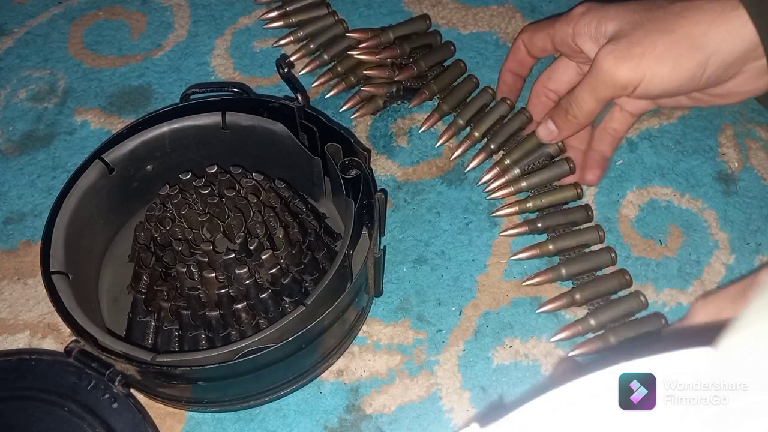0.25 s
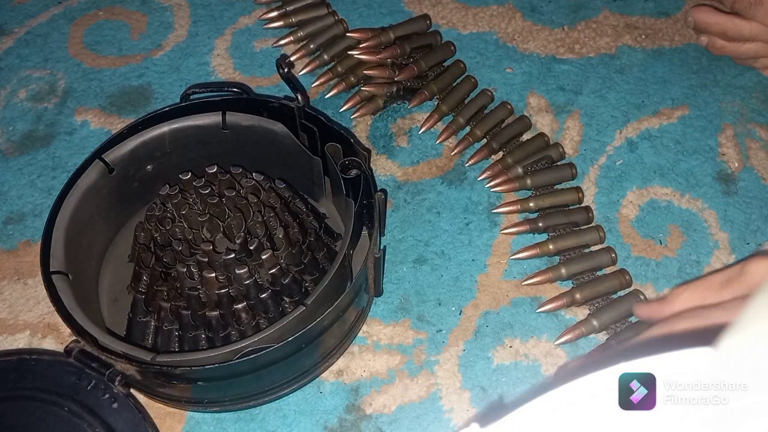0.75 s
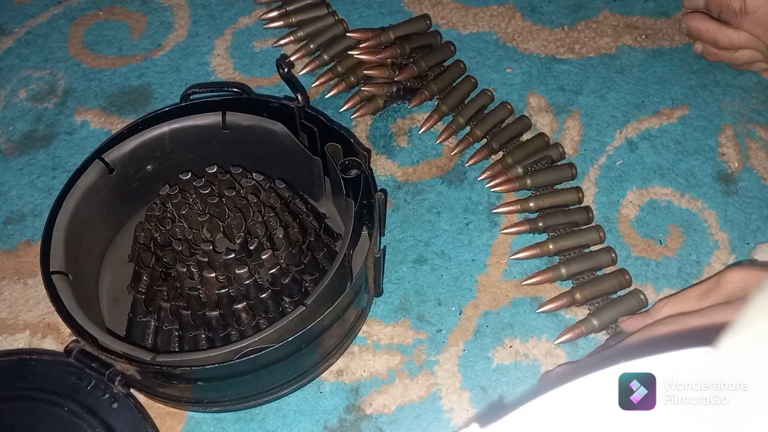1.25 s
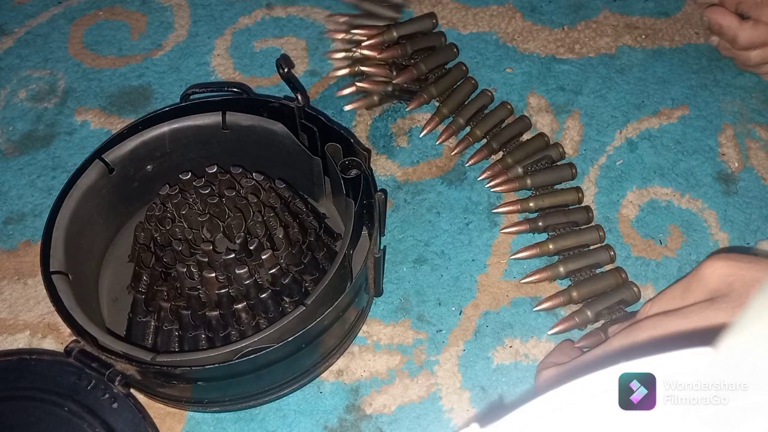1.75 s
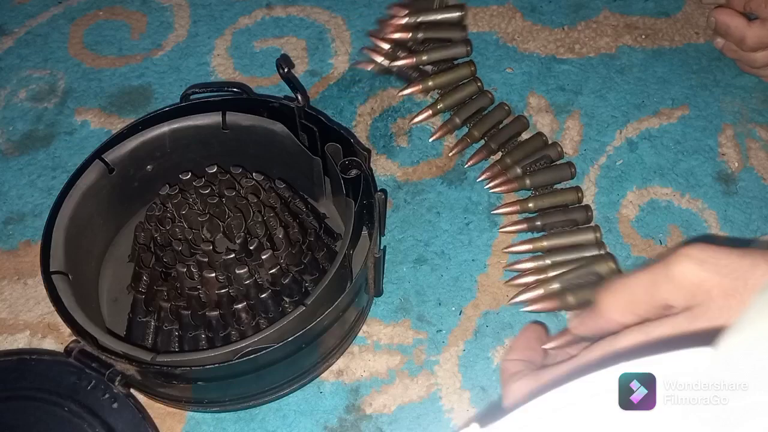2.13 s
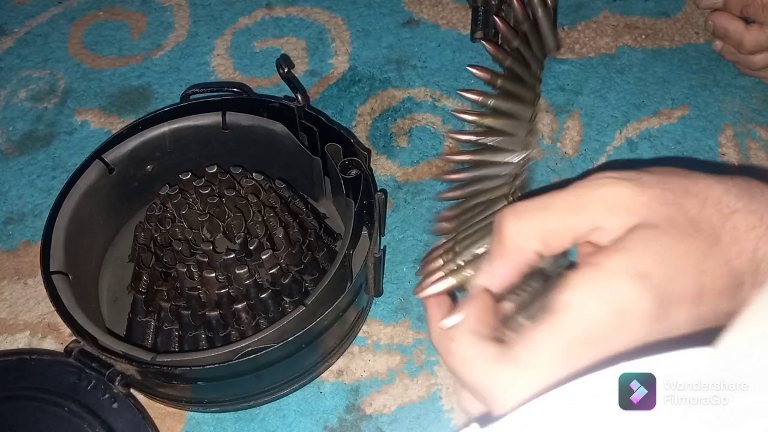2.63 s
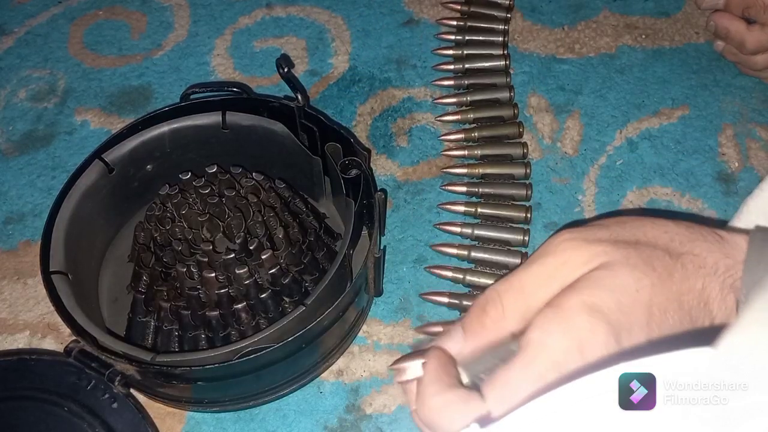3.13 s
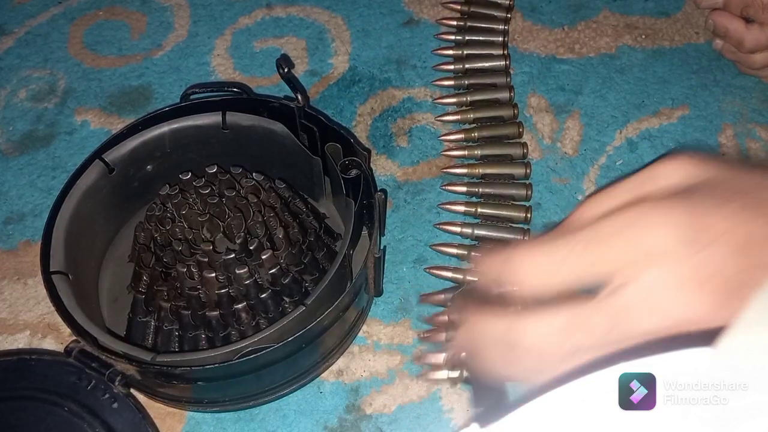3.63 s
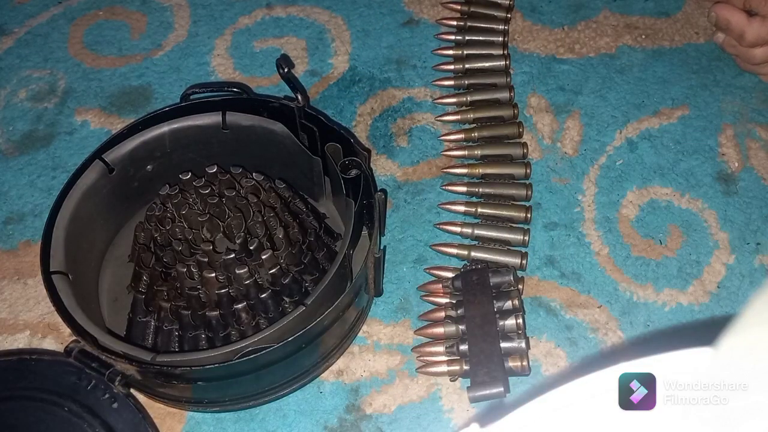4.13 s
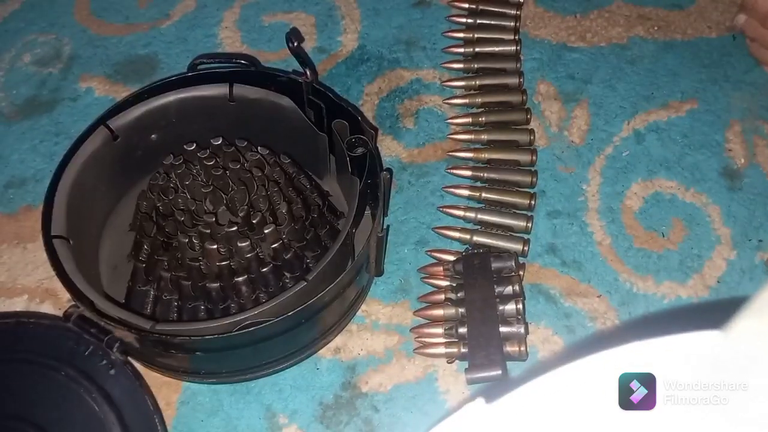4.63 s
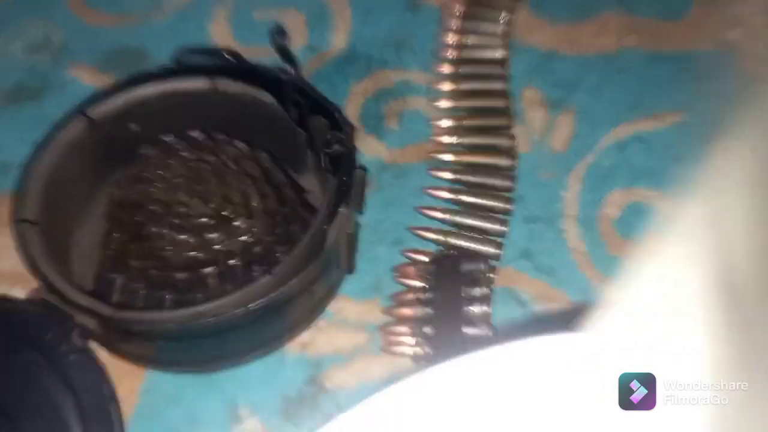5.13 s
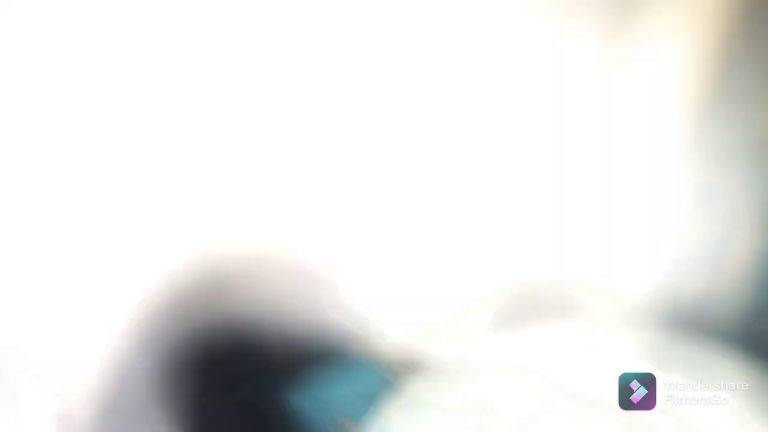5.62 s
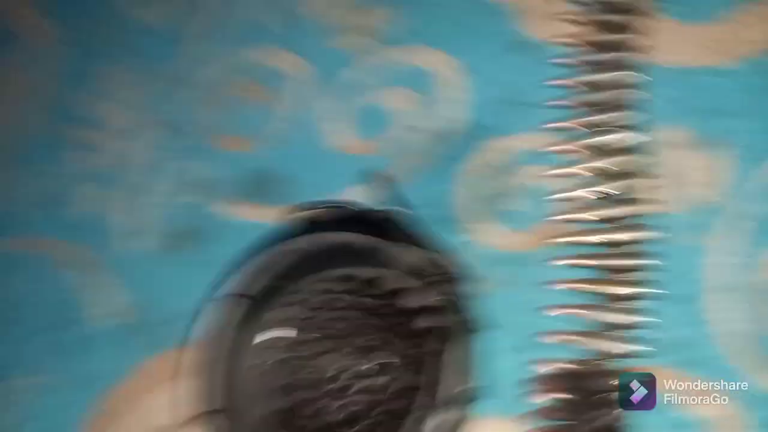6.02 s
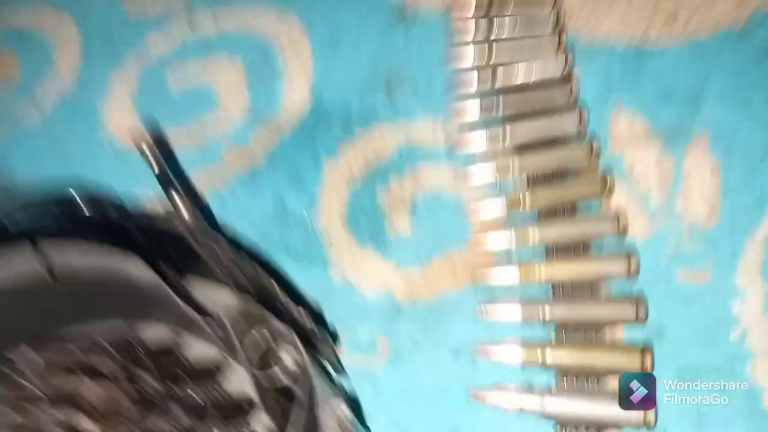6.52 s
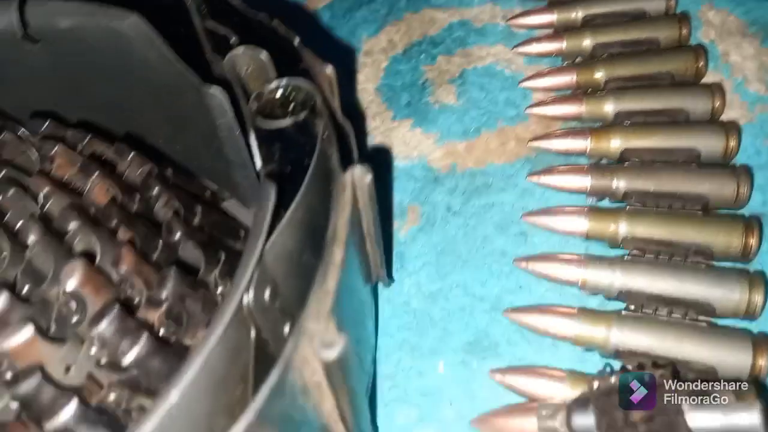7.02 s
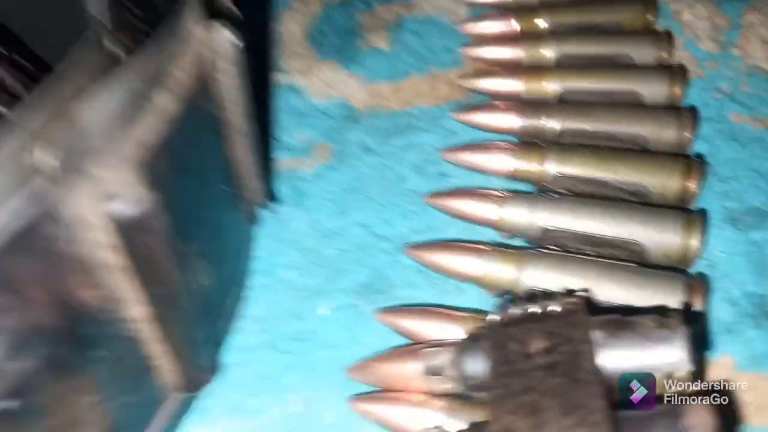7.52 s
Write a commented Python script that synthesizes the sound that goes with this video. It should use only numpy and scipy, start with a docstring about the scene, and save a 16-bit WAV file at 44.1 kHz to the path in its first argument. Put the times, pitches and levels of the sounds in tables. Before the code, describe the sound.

A small, quiet carpeted room with a low rumble. At 0.2-0.3 s a cartridge belt gives a few tiny bright clinks with a soft bump, then cloth brushes faintly around 0.5-0.8 s. Light ticks come at 1.5 s and faint link chatter from 1.7 to 2.5 s. From 2.9 to 3.5 s the folding belt clacks more sharply with a dull floor bump; at 3.6-3.8 s a dense run of bright clinks, a brief falling scrape and cloth hiss mark it being laid down. One small rattle follows at 4.2 s. At 4.45 s a hard finger tap strikes the phone, with rubbing and a faint squeak. Loud close knocks, gritty skin rubs and low thumps crowd 5.1-5.6 s and again 5.9-6.15 s, ending with a faint steel ring. Then soft brushing at 6.5-6.8 and 7.4-7.7 s over a swelling low hum.

```python
"""A linked cartridge belt is dragged and folded on a carpet beside its open steel drum: struck links
tick and ring as short modes, cartridge shells clink, and cloth brushes as a hiss of tiny contacts.
Then the phone lying next to it is picked up: fingers knock, rub and squeak on its resonant case, close
to the two microphone ports, and the case thumps as decaying low swings.
A small furnished room hums underneath as shaped noise with a few narrow resonances."""
import sys
import numpy as np
from scipy import signal
from scipy.fft import rfft, irfft
from scipy.io import wavfile
from scipy.ndimage import uniform_filter1d

SR = 44100
rng = np.random.default_rng(int(sys.argv[2]) if len(sys.argv) > 2 else 0)


def wav_out(sig):
    """Save sig, one row per channel (or a flat mono array), as 16-bit PCM at SR to the path in sys.argv[1]."""
    wavfile.write(sys.argv[1], SR, np.round(np.clip(np.atleast_2d(sig).T, -1, 1) * 32767).astype(np.int16))


N = 342331
TIME = np.arange(N) / SR

# bright tick of a steel link, also used for a fingernail: f/Hz, relative level/dB
TICK_SPECTRUM = [(5000, -26), (7600, -15), (9500, -2.5), (11300, -1), (13000, -4), (16000, -1.5)]
# duller clack of a steel link: f/Hz, relative level/dB
CLACK_SPECTRUM = [(300, -13.5), (900, -6.5), (2200, -10.5), (4100, -1), (5700, 9.5), (6600, 7), (7600, -33),
                  (10000, -18)]
# a movement builds up over a share of its length and dies away with a time constant in s
FLEX_ATTACK_SHARE, FLEX_RELEASE_S = 0.088, 0.0048
SLIDE_ATTACK_SHARE, SLIDE_RELEASE_S = 0.35, 0.0078


def undb(db):
    """Level in decibels to amplitude ratio."""
    return 10 ** (np.asarray(db) / 20)


def unit(x):
    """Normalise the signal power: scale to rms 1."""
    return x / np.sqrt(np.mean(x ** 2) + 1e-30)


def along(points, size):
    """Sample a (f/Hz, value) curve at the bins of a transform, interpolating on a log-frequency axis."""
    hz, value = np.transpose(points)
    return np.interp(np.log(np.fft.rfftfreq(size, 1 / SR) + 1), np.log(hz), value)


def curve(table):
    """Piecewise-linear function of time through (t/s, value) points."""
    return np.interp(TIME, *np.transpose(table))


def colour(x, points):
    """Minimum-phase filtering: the folded cepstrum of a (f/Hz, level/dB) curve gives a causal response."""
    size = 2048
    cepstrum = irfft(np.log(undb(along(points, size))))
    cepstrum[1:size // 2] *= 2
    cepstrum[size // 2 + 1:] = 0
    response = irfft(np.exp(rfft(cepstrum)))
    return signal.fftconvolve(x, response[None], axes=1)[:, :x.shape[1]]


def resonate(x, modes):
    """Linear resonance: a sum of single-pole peaks given as f/Hz, bandwidth/Hz, level/dB."""
    f = np.fft.rfftfreq(N, 1 / SR)
    response = sum(undb(db) / (1 + 2j * (f - hz) / wide) for hz, wide, db in modes)
    return irfft(rfft(x) * response, N)


def drone(hz, wide):
    """Narrow-band noise: white noise passed twice through one resonance, at rms 1."""
    mode = [(hz, wide, 0)]
    once = resonate(rng.standard_normal(N), mode)
    return unit(resonate(once, mode))


def ports(x, pan_db):
    """Level difference between two ports, left minus right in dB, at constant total power."""
    gains = undb(np.array([pan_db, -pan_db]) / 2).reshape(2, -1)
    return x * gains / np.sqrt(np.mean(gains ** 2, axis=0))


def add(out, s, x):
    """Superposition: mix x in at time s."""
    i = int(s * SR)
    out[:, i:i + x.shape[1]] += x[:, :N - i]


def walk(rate):
    """Slow random fluctuation: random steps at this rate in Hz, smoothed twice, with a spread near 1."""
    k = int(SR / rate)
    steps = np.repeat(rng.standard_normal(N // k + 1), k)
    return 1.4 * uniform_filter1d(uniform_filter1d(steps, k), k)[:N]


def stroke(s, length, attack_share, release_s):
    """Envelope of one movement: linear rise, steady hold, exponential decay after its length."""
    attack = np.clip((TIME - s) / (attack_share * length), 0, 1)
    return attack * np.exp(-np.clip((TIME - s - length) / release_s, 0, 20))


def grains(rate, spread_db, size=N):
    """Shot noise: random contacts per second of unequal size, each reaching the two ports differently."""
    sizes = undb(spread_db * np.minimum(rng.exponential(size=size), 4))
    struck = rng.random(size) < rate / SR
    return struck * sizes * rng.standard_normal((2, size))


def ring(modes, t, detune):
    """Modal decay: damped sines (f/Hz, level/dB, T60/s) with independent phases at the two ports."""
    total = 0
    for hz, db, t60 in modes:
        shifted_hz = hz * (1 + detune * rng.standard_normal())
        swing = np.sin(2 * np.pi * (shifted_hz * t + rng.random((2, 1))))
        total = total + undb(db) * np.exp(-np.log(1000) * t / t60) * swing
    return total


def contact(t, decay, grit):
    """Impact excitation: exponentially decaying noise, broken into unequal small contacts by grit."""
    flurry = rng.standard_normal((2, len(t))) * np.exp(grit * rng.standard_normal(len(t)))
    return flurry * np.exp(-t / decay)


def blow(x, db, decay, pan_db):
    """Energy scaling: give a hit the energy of a burst that starts at db and dies with this decay time."""
    x = x / np.sqrt(np.sum(x ** 2, axis=1, keepdims=True))
    return ports(x, pan_db) * undb(db) * np.sqrt(decay * SR / 2)


def link_ring(x, t60, count=14):
    """Modal response of a stamped steel link: short irregular modes, drawn anew for every call."""
    t = TIME[:SR // 12]
    modes = [(hz, 0, t60) for hz in rng.uniform(2500, 15500, count)]
    return unit(signal.fftconvolve(x, ring(modes, t, detune=0), axes=1)[:, :x.shape[1]])


def clinks(ring_db=-4, link_db=-5, bounce_db=-20, bounce_s=0.0037, snap_db=5, snap_s=0.0017, gain_db=1):
    """Impact and modal response: each strike snaps and bounces in a link and rings a detuned shell."""
    # strikes of cartridges and links: t/s, level before gain_db/dB, rattle decay/s,
    # clack relative to tick and shell/dB, left minus right/dB
    strikes = [(0.191, -39.5, 0.0015, -13, -16), (0.279, -52, 0.0074, 10, -25),
               (0.301, -44.5, 0.0018, -7, -13), (1.455, -51.5, 0.0015, -6, -5),
               (1.499, -47, 0.0024, -11, -6), (1.99, -53, 0.0048, 3.5, -18), (2.2386, -58, 0.011, 23, -15),
               (2.9707, -39, 0.0021, -3, -8), (2.996, -47.5, 0.0041, 19, -8),
               (3.2751, -41, 0.0014, -14, -13), (3.4987, -53, 0.015, 2.5, -10.5),
               (3.516, -49.5, 0.0032, -3.5, -5), (3.56, -51.5, 0.0043, -1, -14),
               (3.594, -50, 0.0051, 1.5, -5), (3.658, -42.5, 0.0033, 0, -6), (3.7046, -35, 0.0022, -12, -5),
               (3.7182, -31.5, 0.002, -10.5, -7), (3.7347, -47, 0.0053, -2, 4),
               (3.7891, -41, 0.0026, -7, -12), (5.031, -54, 0.012, 19, 1)]
    # modes of a cartridge shell: mean f/Hz, relative level/dB, T60/s
    shell_modes = [(4970, -1.5, 0.063), (11030, 18, 0.016), (11570, 16.5, 0.012)]
    out, t = np.zeros((2, N)), TIME[:SR // 6]
    for s, db, decay, clack_db, pan_db in strikes:
        snap = undb(snap_db) * contact(t, snap_s, grit=0)
        rattle = contact(t, decay, grit=0.96)
        bounce = undb(bounce_db) * contact(t, bounce_s, grit=0.38)
        push = snap + rattle + bounce
        link = unit(push) + undb(link_db) * link_ring(push, t60=0.0091)
        shell = signal.fftconvolve(push, ring(shell_modes, t, detune=0.0178), axes=1)[:, :len(t)]
        bright = unit(unit(colour(link, TICK_SPECTRUM)) + undb(ring_db) * unit(shell))
        clack = undb(clack_db) * unit(colour(link, CLACK_SPECTRUM))
        add(out, s, blow(bright + clack, db + gain_db, decay, pan_db))
    return out


def chatter(pan_db=-9, ring_db=0, cluster_db=0.5, count=4):
    """Shot excitation of modes: each pull shifts several links in clusters of tiny ringing ticks."""
    # pulls and folds of the belt: t/s, length/s, level/dB, clack relative to tick/dB
    flexes = [(1.658, 0.89, -80, 6), (1.729, 0.023, -69.5, 0.5), (1.775, 0.069, -67, -1.5),
              (1.866, 0.021, -66, 2.5), (2.909, 0.051, -69, 4), (2.976, 0.029, -58.5, 0.5),
              (3.198, 0.071, -67.5, 1), (3.286, 0.022, -58.5, 1), (3.621, 0.06, -62, -3),
              (4.172, 0.032, -61.5, 3)]
    out, clusters = np.zeros((2, N)), undb(cluster_db * walk(30.3))
    for s, length, db, clack_db in flexes:
        span = slice(int(s * SR), int((s + length + 10 * FLEX_RELEASE_S) * SR))
        effort = (clusters * stroke(s, length, FLEX_ATTACK_SHARE, FLEX_RELEASE_S))[span]
        links = 0
        for _ in range(count):
            ticks = grains(rate=220, spread_db=4, size=SR + SR // 2)[:, :len(effort)]
            links = links + unit(ticks) + undb(ring_db) * link_ring(ticks, t60=0.023)
        clack = undb(clack_db) * unit(colour(links, CLACK_SPECTRUM))
        sound = unit(colour(links, TICK_SPECTRUM)) + clack
        add(out, s, sound * effort * undb(db))
    return ports(out, pan_db)


def scrape(s=3.62, length=0.068, db=-62, start_hz=4500, fall_octaves_per_s=4.7, width_hz=1000, catch_db=2.0):
    """Stick-slip friction: a link slips along a cartridge as the folded end is laid down; its note falls."""
    glide = 2 ** (-fall_octaves_per_s * np.clip(TIME - s, 0, 2 * length))
    # reading the noise ever more slowly lowers its pitch
    note = np.interp(np.cumsum(glide) / SR, TIME, drone(start_hz, width_hz))
    caught = unit(note * undb(catch_db * walk(190)))
    return caught * undb(db) * stroke(s, length, FLEX_ATTACK_SHARE, FLEX_RELEASE_S)


def brush(flutter_db=1, body_hz=2200, body_width_hz=1400, attack_share=0.78, release_s=0.17):
    """Friction noise: cloth and carpet fibres hiss as dense shot noise over a broad resonance."""
    # sleeve and belt over the carpet: t/s, length/s, hiss level/dB, left minus right/dB, relative body/dB
    sweeps = [(0.42, 0.36, -71, -13.5, -22), (1.37, 1.49, -74, -9.5, -15.5), (3.43, 0.57, -65, -13, -12),
              (6.457, 0.38, -73.5, -8, -12), (7.384, 0.18, -66, -14.5, -8), (7.557, 0.2, -78.5, -44, 9)]
    # spectrum of the cloth: f/Hz, relative level/dB
    cloth = [(300, 1.5), (1200, -5.5), (2000, -12), (3800, -1.5), (5600, 2), (6600, -5), (7600, -29),
             (11000, -18), (16000, -13)]
    hiss = unit(colour(grains(rate=9800, spread_db=-1), cloth)) * undb(flutter_db * walk(23.0))
    body = drone(body_hz, body_width_hz)
    out = np.zeros((2, N))
    for s, length, db, pan_db, body_db in sweeps:
        fibres = ports(hiss + undb(body_db) * body, pan_db)
        out += fibres * undb(db) * stroke(s, length, attack_share, release_s)
    return out


def port_air(x):
    """Cavity resonance: the air in each microphone port colours whatever touches the case."""
    # left, then right port: f/Hz, bandwidth/Hz, level/dB
    port_modes = [(4360, 1100, 8), (5650, 190, 7)]
    return np.array([channel + resonate(channel, [mode]) for channel, mode in zip(x, port_modes)])


def knocks(gain_db=-3, tail_db=-30, tail_s=0.057, clean_s=0.00039):
    """Impact duration: the briefer the touch, the more one clean push joins its flurry; the case buzzes on."""
    # fingers on the case: t/s, level before gains/dB, decay/s, hardness at 3-7 kHz/dB,
    # nail tick above 8 kHz/dB, left minus right/dB, low edge f/Hz
    touches = [(4.4503, -11.5, 0.00051, -3.5, -15.5, 16, 1130),
               (4.474, -27, 0.0026, -17.5, -5.5, -0.5, 350), (4.526, -35.5, 0.0067, -1, -10.5, -3.5, 300),
               (4.6816, -37, 0.004, -4.5, -9.5, -9.5, 1280), (4.83, -56.5, 0.024, -6, -10, -1, 582),
               (5.0786, -39.5, 0.00088, 7.5, -4, 13.5, 306), (5.181, -28.5, 0.0082, -1.5, -16, 7.5, 820),
               (5.2121, -26, 0.0032, 9, -22, 25.5, 600), (5.2823, -18.5, 0.0018, -14, -42, -6.5, 150),
               (5.303, -27.5, 0.0036, 0.5, -27.5, 18, 700), (5.3898, -25, 0.0034, 5.5, 5.5, -15, 400),
               (5.4896, -26, 0.0061, -1.5, -19, 9, 453), (5.517, -35.5, 0.0038, -6, -22, 13, 300),
               (5.9202, -19, 0.0037, -10, -36, 22.5, 250), (5.924, -19.5, 0.0041, 2.5, -11.5, 0, 300),
               (6.0304, -27.5, 0.0013, 4.5, -27, 21, 300), (6.0552, -16, 0.0033, -17, -47, 4, 99.3),
               (6.069, -33, 0.014, -3, -26, -3, 200), (6.0996, -31.5, 0.0039, 2.5, -9, -8, 300),
               (6.126, -35, 0.0013, -22, -19, -13, 150), (6.1524, -41.5, 0.007, -9.5, -18, -8, 150)]
    # case under a soft, then under a hard touch: f/Hz, relative level/dB
    case_soft = [(100, 3.5), (400, 8), (850, -0.5), (1600, 2), (2500, -1.5), (3200, -20.5), (5000, -41.5)]
    case_hard = [(2000, -31), (3200, -0.5), (4200, -2), (5400, -5.5), (6500, -12.5), (7300, -31),
                 (10000, -48)]
    out, t = np.zeros((2, N)), TIME[:SR // 6]
    for s, db, decay, hard_db, nail_db, pan_db, low_hz in touches:
        flurry = contact(t, decay, grit=0.67) + undb(tail_db) * contact(t, tail_s, grit=0.18)
        push = unit(flurry) + clean_s / decay * unit(signal.unit_impulse(len(t)))
        push = signal.sosfilt(signal.butter(2, low_hz, "high", fs=SR, output="sos"), push)
        soft = unit(colour(push, case_soft))
        hard = undb(hard_db) * unit(colour(push, case_hard))
        nail = undb(nail_db) * unit(colour(push, TICK_SPECTRUM))
        add(out, s, blow(soft + hard + nail, db + gain_db, decay, pan_db))
    return port_air(out)


def rub(stick_db=0.7, shift_db=3.0, body_hz=1900, body_width_hz=1300):
    """Stick-slip friction: skin slips over the case, its shot noise coloured by the air in the ports."""
    # finger slides: t/s, length/s, level before the case gain/dB, left minus right/dB, finger pad body/dB
    slides = [(4.438, 0.07, -49.5, 5.5, -2.5), (4.541, 0.083, -47.5, 6.5, -15),
              (4.695, 0.076, -63, -8.5, 6), (4.967, 0.037, -54.5, 5.5, -2), (5.068, 0.037, -49, 20, 0),
              (5.088, 0.11, -34.5, 12.5, 4), (5.201, 0.067, -37, 13, -2), (5.272, 0.15, -37, 17.5, 5),
              (5.368, 0.2, -45.5, 13, -3), (5.752, 0.16, -57.5, 15, -14.5), (5.842, 0.026, -53.5, 14, 1.5),
              (5.921, 0.053, -46.5, 13.5, 0.5), (6.005, 0.031, -46, 14, 8), (6.231, 0.041, -67, 18, -7)]
    # spectrum of the skin: f/Hz, relative level/dB
    skin = [(150, 7), (500, -12), (1500, -6), (3200, -3.5), (5300, -1.5), (6300, -16), (7400, -29.5),
            (10000, -19), (16000, -27)]
    slips = colour(grains(rate=4000, spread_db=2.5), skin) * undb(stick_db * walk(50))
    heard = np.array([unit(x) for x in port_air(slips)])
    body = resonate(heard, [(body_hz, body_width_hz, 0)])
    # as the finger rolls between tip and pad, the low body comes and goes
    roll = undb(shift_db * walk(22))
    out = np.zeros((2, N))
    for s, length, db, pan_db, pad_db in slides:
        scraped = ports(heard + (roll * undb(pad_db) - 1) * body, pan_db)
        out += scraped * undb(db) * stroke(s, length, SLIDE_ATTACK_SHARE, SLIDE_RELEASE_S)
    return out


def squeaks(sharpness=12, pan_db=-9, catch_db=4.5):
    """Friction-driven resonance: a finger creeps along the right edge on one hoarse note that catches."""
    # singing creeps: t/s, length/s, level before catching/dB, f/Hz
    creeps = [(4.7, 0.16, -71, 5550), (5.564, 0.28, -76, 2260)]
    note = np.zeros(N)
    for s, length, db, hz in creeps:
        envelope = stroke(s, length, FLEX_ATTACK_SHARE, SLIDE_RELEASE_S)
        note += drone(hz, hz / sharpness) * undb(db) * envelope
    return ports(note * undb(catch_db * walk(20)), pan_db)


def pings():
    """Free vibration: the belt bumps down or a fingertip pats the phone, and one resonance rings on."""
    # bumps and taps: t/s, peak level/dB, f/Hz, T60/s, left minus right/dB
    taps = [(2.9927, -48, 1960, 0.0052, -7), (3.789, -39, 4030, 0.012, -2.5),
            (4.474, -20.5, 5640, 0.019, -17), (4.476, -32.5, 852, 0.064, -2),
            (6.0554, -30, 6020, 0.013, -12.5)]
    out = np.zeros((2, N))
    for s, db, hz, t60, pan_db in taps:
        add(out, s, ports(ring([(hz, db, t60)], TIME[:SR // 10], detune=0), pan_db))
    return out


def thumps(rise_s=0.00061, thud_db=-7, gain_db=1):
    """Damped oscillation: a weight lands softly, with low swings and a dull thud around one pitch."""
    # belt on the floor, then hand on the phone: t/s, swing level before gain_db/dB, f/Hz, T60/s,
    # left minus right/dB
    bumps = [(0.274, -46.5, 420, 0.013, -5), (2.993, -39, 438, 0.0092, -3.5), (4.481, -32, 105, 0.11, 19.5),
             (5.185, -32, 100, 0.33, 24), (5.285, -20, 112.6, 0.12, 22), (5.39, -31, 81.6, 0.14, 28),
             (5.657, -47, 259, 0.028, 1), (5.926, -24.5, 91, 0.13, 17), (5.986, -38.5, 272, 0.086, 1.5),
             (6.032, -22.5, 87.5, 0.23, 30.5), (6.057, -22, 178.7, 0.13, 0)]
    out, t = np.zeros((2, N)), TIME[:SR // 2]
    for s, db, hz, t60, pan_db in bumps:
        spectrum = [(hz / 4, -14), (hz / 2, -2), (hz, 0), (2.3 * hz, -8), (5 * hz, -13), (20 * hz, -45)]
        thud = unit(colour(rng.standard_normal((1, len(t))), spectrum))
        swing = np.sin(2 * np.pi * hz * t) + undb(thud_db) * thud
        envelope = (1 - np.exp(-t / rise_s)) * np.exp(-np.log(1000) * t / t60)
        add(out, s, ports(swing * envelope, pan_db) * undb(db + gain_db))
    return out


def steel(s=6.099):
    """Exponential decay: nudged steel rings at one mode, and a fainter, higher tone sounds with it."""
    # mode of the steel, then the higher tone: mean f/Hz, level/dB, T60/s
    ring_tones = [(3510, -52, 0.19), (6550, -56, 0.13)]
    out = np.zeros((2, N))
    add(out, s, ring(ring_tones, TIME[:SR // 2], detune=.001))
    return out


def room_tone(level_db=-70, waver_db=0.5, hum_hz=410, hum_width_hz=30):
    """Partly coherent noise: a low rumble alike in both ports mainly in the bass, with narrow drones."""
    # spectrum of the quiet room: f/Hz, relative density/dB per Hz
    spectrum = [(25, -31), (50, -10.5), (75, 1.5), (120, -9.5), (300, -12), (650, -24.5), (1300, -33),
                (5200, -34.5), (6400, -35.5), (7600, -47), (16000, -39)]
    # likeness of the two ports: f/Hz, coherence (0-1)
    port_likeness = [(500, 0.66), (1400, 0.18), (7000, .05)]
    # low resonances of the room: f/Hz, bandwidth/Hz, level/dB
    room_modes = [(78, 11, -75), (228.8, 9.2, -78.5), (686.7, 23, -90.5)]
    # hum that grows as the phone moves in beside the drum: t/s, level/dB
    hum_level = [(0, -89.5), (6.4, -84), (7.76, -70)]
    mid, side = rfft(rng.standard_normal((2, N)))
    shape, likeness = undb(along(spectrum, N)), np.clip(along(port_likeness, N), 0, 1)
    centre = irfft(mid * shape, N)
    width = irfft(side * shape * np.sqrt((1 - likeness) / (1 + likeness)), N)
    air = np.array([centre + width, centre - width]) / np.std(centre)
    air = air * undb(level_db + waver_db * walk(2.2))
    drones = sum(undb(db) * drone(hz, wide) for hz, wide, db in room_modes)
    hum = undb(curve(hum_level)) * drone(hum_hz, hum_width_hz)
    return air + drones + hum


def walls(x, t60, wet_db):
    """Diffuse reverberation: the short echo of a carpeted room as exponentially decaying noise."""
    t = TIME[:SR // 2]
    envelope = np.exp(-np.log(1000) * t / t60) * (1 - np.exp(-t / 0.0072))
    tail = rng.standard_normal((2, len(t))) * envelope
    tail /= np.sqrt(np.sum(tail ** 2, axis=1, keepdims=True))
    return x + undb(wet_db) * signal.fftconvolve(x, tail, axes=1)[:, :N]


def scene(case_db=-2.5):
    """Superposition: the belt on the carpet, the hand on the phone's resonant case, and the room."""
    # resonances of the phone's case: f/Hz, bandwidth/Hz, level/dB
    case_modes = [(825, 110, -0.5), (1420, 200, -6), (2240, 290, -2), (3810, 120, -3)]
    belt = walls(clinks() + chatter() + scrape(), t60=0.17, wet_db=-11.0)
    touch = undb(case_db) * (knocks() + rub())
    # the hand is so near that the room hardly counts
    hand = walls(touch + resonate(touch, case_modes), t60=.15, wet_db=-21)
    return belt + brush() + hand + pings() + squeaks() + thumps() + steel() + room_tone()


def record(dry, low_cut_hz=42, top_hz=15900):
    """Band limiting: the phone cuts the deepest bass and, steeply, the top."""
    dry = signal.sosfilt(signal.butter(2, low_cut_hz, "high", fs=SR, output="sos"), dry)
    return signal.sosfilt(signal.ellip(8, .2, 70, top_hz, fs=SR, output="sos"), dry)


dry = scene()
out = record(dry)
wav_out(out)
```